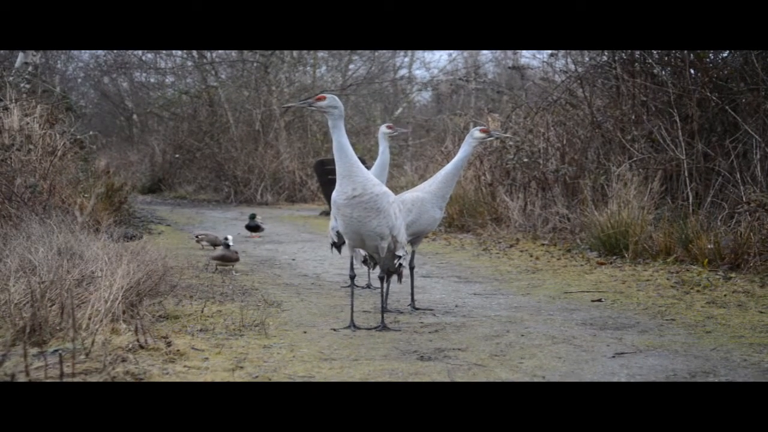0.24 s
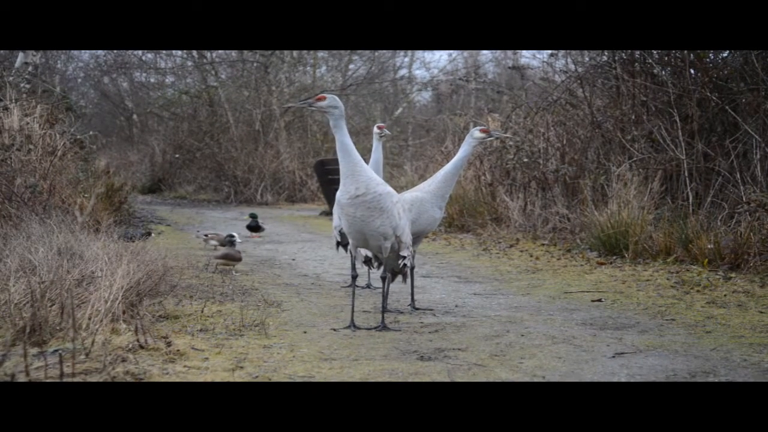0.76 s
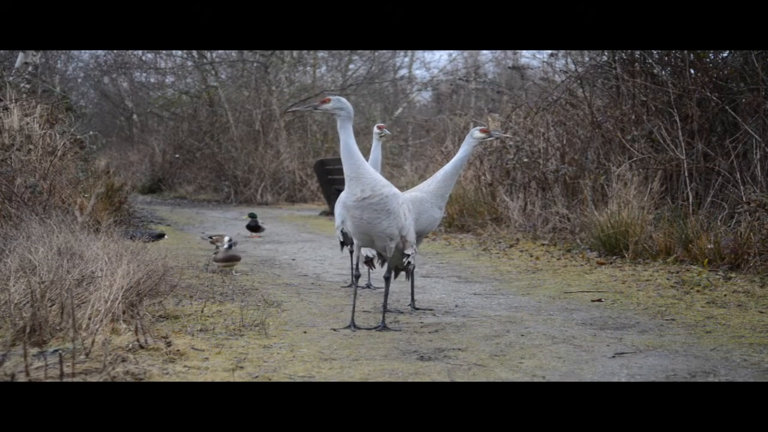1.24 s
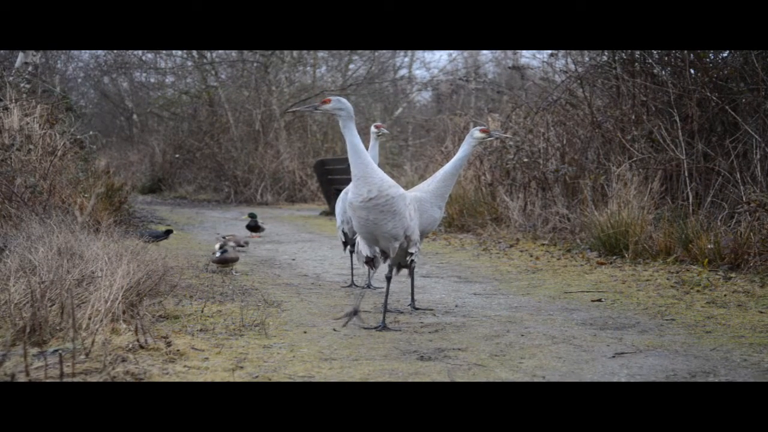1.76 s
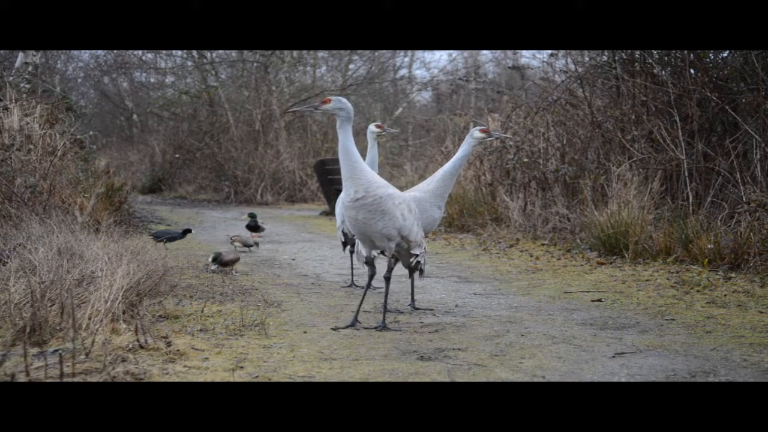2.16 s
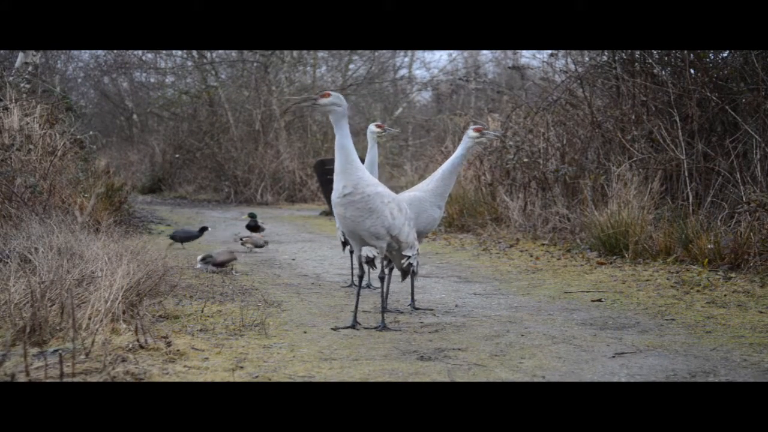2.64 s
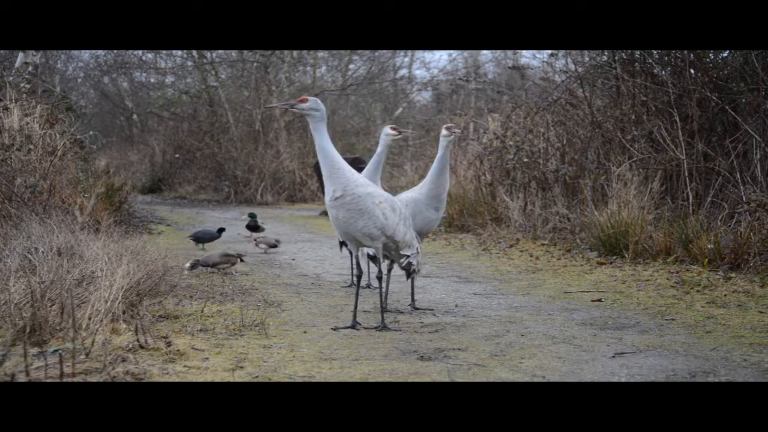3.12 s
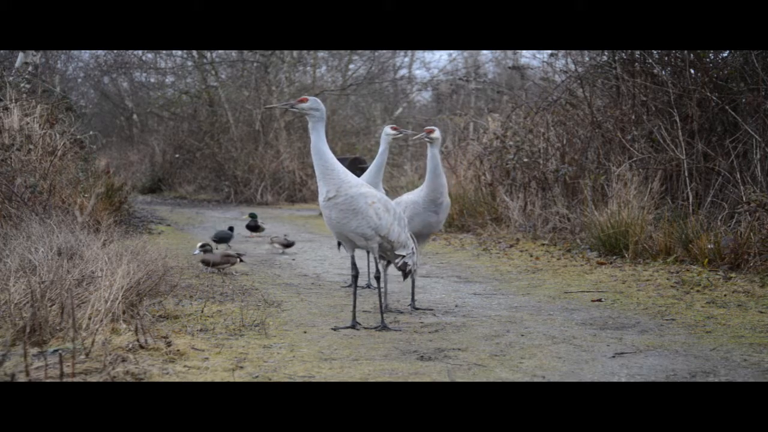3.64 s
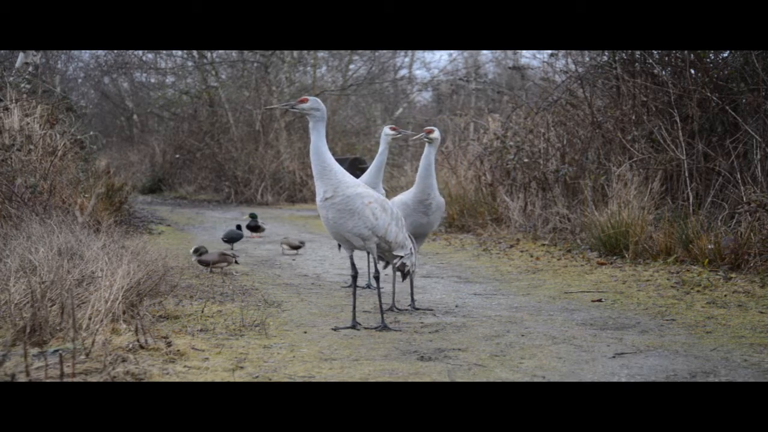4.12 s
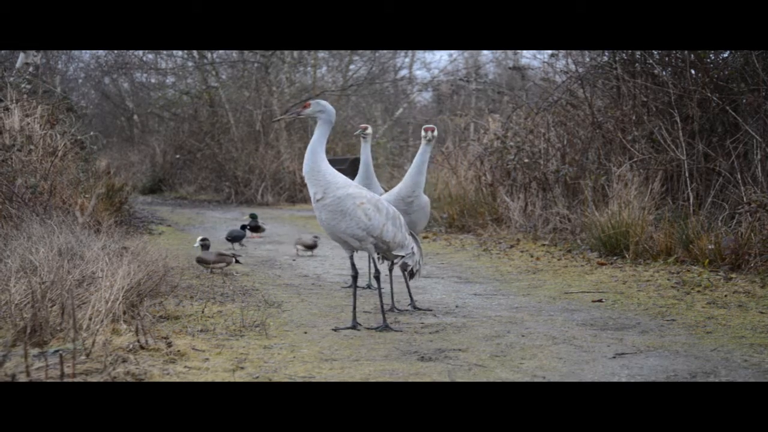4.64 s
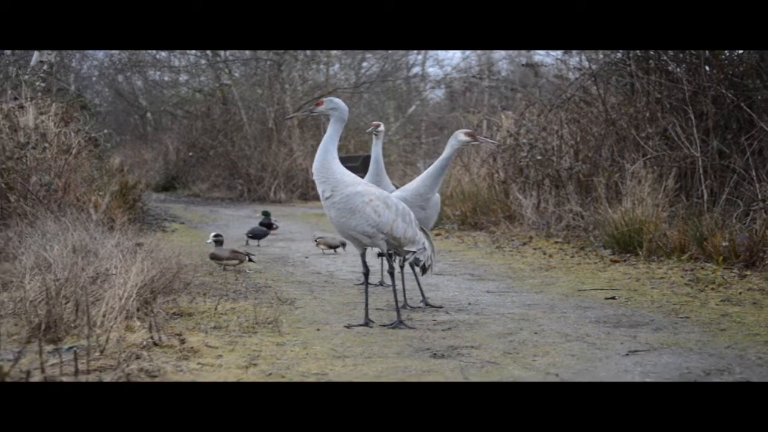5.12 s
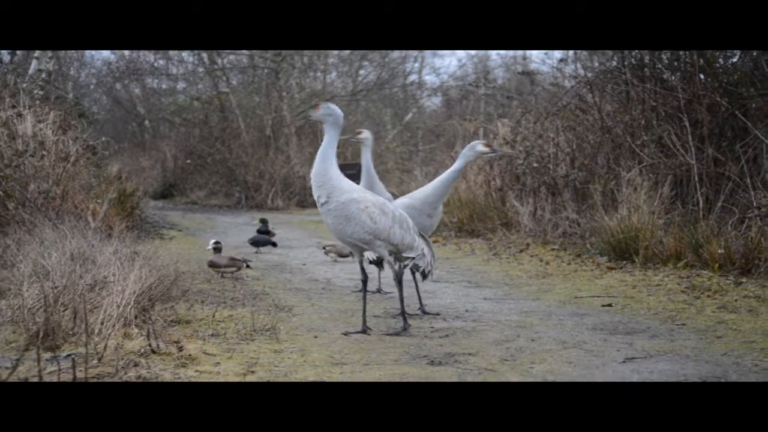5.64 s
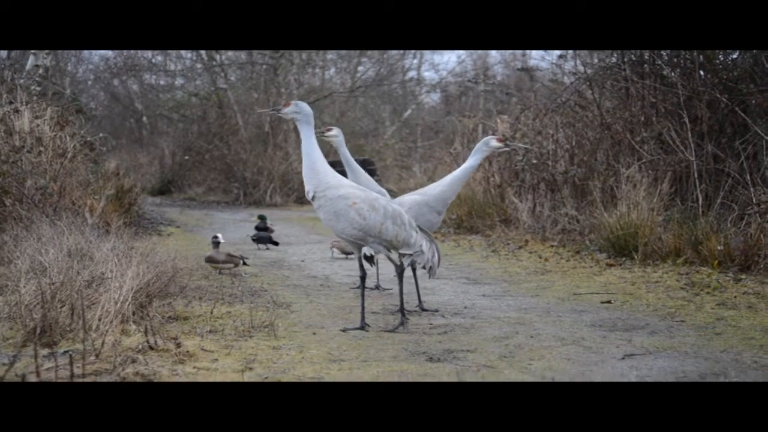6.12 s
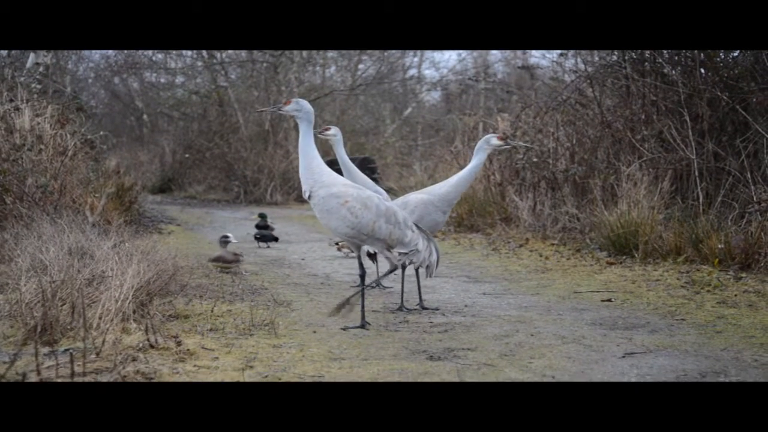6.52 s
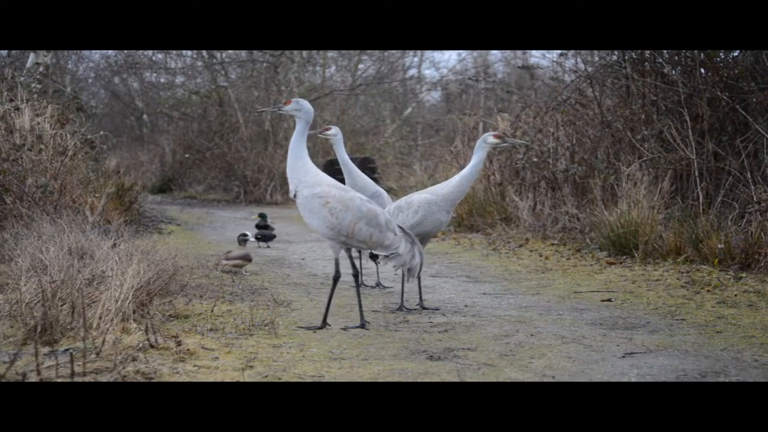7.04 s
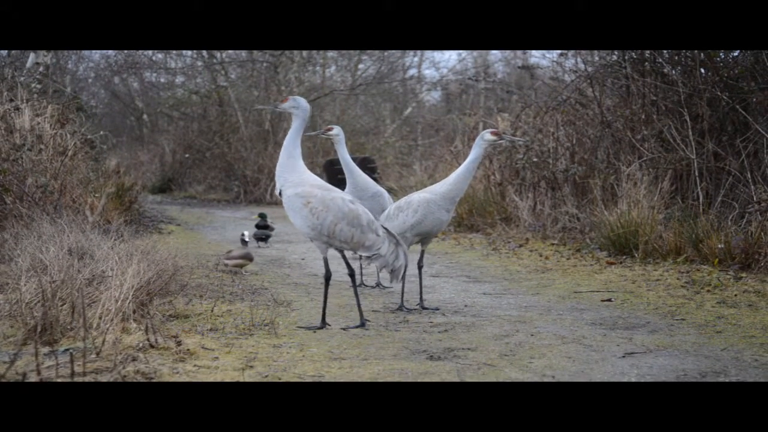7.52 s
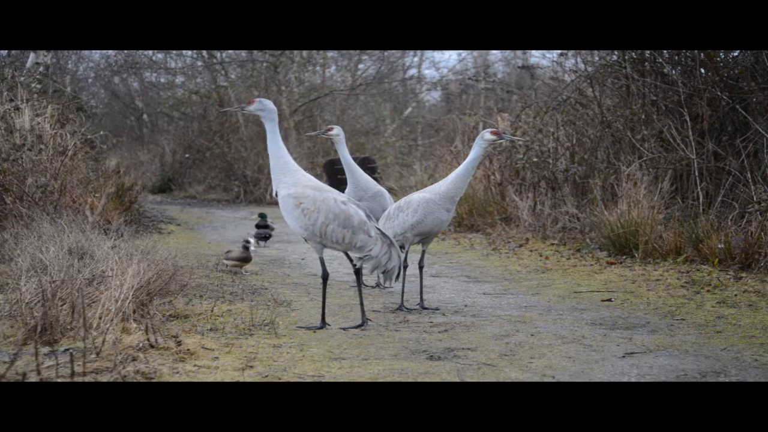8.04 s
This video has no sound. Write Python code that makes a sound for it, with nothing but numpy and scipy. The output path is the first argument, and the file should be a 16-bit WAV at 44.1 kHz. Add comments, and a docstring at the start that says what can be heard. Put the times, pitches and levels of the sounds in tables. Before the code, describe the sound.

Sandhill cranes give two loud rattling calls outdoors, with faint sharp taps and soft rustles over still air between them.

```python
"""Sharp taps, ticks and soft rustles sound close by on a wooded path, over a hum and small far birds.
Then sandhill cranes call twice, near enough to overload the microphone. Each call is a short reedy
note, then a rattle of falling honks, a low and a high voice interleaved with hoarse squawks.
The syrinx slaps once a cycle and rings the windpipe; the thicket scatters the calls and rings on."""
import sys
import numpy as np
from scipy import signal
from scipy.fft import rfft, irfft, next_fast_len
from scipy.io import wavfile
from scipy.ndimage import map_coordinates

SR = 44100
rng = np.random.default_rng(int(sys.argv[2]) if len(sys.argv) > 2 else 0)


def unload_wav(signal):
    """Save mono or channel-first audio to the path in sys.argv[1] as 16-bit WAV at rate SR, clipped to [-1, 1]."""
    wavfile.write(
        sys.argv[1],
        SR,
        np.round(np.clip(np.atleast_2d(signal).T, -1, 1) * 32767).astype(np.int16),
    )


N = 364707
TOP_HZ = 15900  # band limit


def amp(db):
    """Decibels to gain."""
    return 10 ** (np.asarray(db) / 20)


def unit(x):
    """Scale to rms 1."""
    return x / np.sqrt(np.mean(x ** 2) + 1e-20)


def along(points, hz):
    """Read a (Hz, value) curve on a log frequency axis."""
    freqs, values = np.transpose(points)
    return np.interp(np.log(hz + 1), np.log(freqs + 1), values)


def automation(points, t):
    """Read a (seconds, value) curve at the times t."""
    return np.interp(t, *np.transpose(points))


def wobble(rate, size):
    """A smooth random curve, rate knots a second."""
    return map_coordinates(rng.standard_normal(size // 8 + 8), [np.arange(size) * rate / SR + 2])


def add(track, start, x):
    """Mix x into the track at start seconds."""
    i = max(round(start * SR), 0)
    track[i:i + len(x)] += x[:len(track) - i]


def colour(x, points):
    """Minimum-phase EQ along a (Hz, dB) curve."""
    size = next_fast_len(len(x) + 2048)
    cepstrum = irfft(np.log(amp(along(points, np.fft.rfftfreq(size, 1 / SR)))), size)
    cepstrum[1:size // 2] *= 2
    cepstrum[size // 2 + 1:] = 0
    return irfft(rfft(x, size) * np.exp(rfft(cepstrum)), size)[:len(x)]


def noise(points):
    """Coloured noise of rms 1."""
    return unit(colour(rng.standard_normal(N), points))


def sine(hz):
    """A sine that follows a pitch curve."""
    return np.sin(2 * np.pi * np.cumsum(hz) / SR)


def wavering(hz, width_hz, size):
    """A narrow band of noise, heard as an unsteady tone; rms 1."""
    phase = 2 * np.pi * hz * np.arange(size) / SR
    return unit(wobble(width_hz, size) * np.cos(phase) + wobble(width_hz, size) * np.sin(phase))


def puff(points, decay_s):
    """A coloured burst of energy 1 that dies quickly, with a weak after-rattle."""
    t = np.arange(SR // 25) / SR
    envelope = np.exp(-t / decay_s) + .025 * np.exp(-t / .008)
    burst = colour(rng.standard_normal(len(t)) * envelope, points)
    return burst / np.linalg.norm(burst)


# Tone of the still air. Each row: frequency in Hz, gain in dB.
AIR_EQ = [(10, -38), (25, -16.5), (50, -2.5), (90, 0.5), (130, -6), (200, -7), (450, -14), (1250, -17.5),
          (2240, -16.5), (3300, -19.5), (4800, -15.5), (6000, -19.5), (8500, -29), (11000, -28.5),
          (15800, -26)]
# Swells of the engine hum. Each row: time in seconds, level in dB.
HUM_LEVELS = [(0, -67), (1.3, -59.5), (2.4, -65.5), (3.7, -62), (4.8, -70.5), (6.7, -55), (7.4, -53),
              (8.27, -71.5)]
def background(air_db=-52.5, whine_db=-66, hum_hz=152, whine_hz=4815):
    """The bed: still air, a distant engine hum and a thin high whine."""
    t = np.arange(N) / SR
    air = amp(air_db + .15 * wobble(8, N)) * noise(AIR_EQ)
    hum = amp(automation(HUM_LEVELS, t) + wobble(7, N)) * sine(hum_hz + 1.8 * wobble(9, N))
    whine = amp(whine_db) * sine(whine_hz + 7 * wobble(60, N))
    return air + np.sqrt(2) * (hum + whine)  # sine peak from rms


# Bird notes. Each row: start in seconds, length in seconds, pitch in Hz, level in dB.
CHIRP_CUES = [(0.384, 0.013, 1510, -45.5), (0.722, 0.027, 2250, -47.5), (1.337, 0.043, 2080, -56),
              (1.4, 0.4, 4120, -59), (7.25, 0.42, 1226, -58.5), (7.82, 0.25, 860, -64),
              (8.0, 0.16, 865, -62)]
def far_birds():
    """Faint notes from the bushes, each fading in and out."""
    out = np.zeros(N)
    for start, length, hz, db in CHIRP_CUES:
        size = int(length * SR)
        add(out, start, amp(db) * np.hanning(size) * wavering(hz, .16 * hz, size))
    return out


# Decay of the thicket's reverb. Each row: frequency in Hz, seconds to fall by 60 dB.
THICKET_DECAY = [(200, 0.27), (700, 2.2), (1050, 2.09), (1700, 1.9), (5000, 1.42), (8000, 1.7),
                 (15000, 0.17)]
# Tone of that reverb. Each row: frequency in Hz, gain in dB.
THICKET_EQ = [(200, -12), (600, -2.5), (800, -4), (1100, -5.5), (1350, -4.5), (1800, 0.5), (2400, 1.5),
              (3200, -1.5), (5500, -2.5), (9000, -9)]
def thicket(send, build_s=.012, near_db=5, near_s=.0095):
    """Twigs and trunks scatter the sound back, the near bushes first."""
    hz, t, bands = signal.stft(rng.standard_normal(2 * SR), SR, nperseg=256)
    onset = (1 - np.exp(-t / build_s)) * (1 + amp(near_db) * np.exp(-t / near_s))
    decay = amp(-60 * t / along(THICKET_DECAY, hz)[:, None])
    tail = signal.istft(bands * onset * decay, SR, nperseg=256)[1]
    return signal.fftconvolve(send, colour(tail / np.linalg.norm(tail), THICKET_EQ))[:N]


# Rustles. Each row: start, rise, hold and fade in seconds, relative level in dB.
RUSTLE_CUES = [(0.012, 0.0082, .003, .012, -24.5), (.03, .01, .01, .06, -39), (0.202, .005, .01, .25, -52),
               (4.21, .012, .03, .015, -45), (4.279, .08, 0.14, 0.053, -40), (4.67, 0.0021, .055, .01, -44),
               (4.901, 0.015, 0.017, .02, -46), (5.43, .006, .003, .008, -42),
               (5.582, 0.01, .016, .006, -39.5), (5.672, .022, .005, .008, -24)]
# Their papery tone. Each row: frequency in Hz, gain in dB.
RUSTLE_EQ = [(120, -62), (200, -28.5), (235, -18.5), (405, -25.5), (451, -12), (683, -18), (1290, -8),
             (4090, -6.5), (5170, 4), (5860, -11.5), (6420, -5.5), (8120, -27), (15000, -35.5)]
def rustles():
    """Soft grainy brushing sounds: each rises, holds and fades."""
    t = np.arange(N) / SR
    envelope = np.zeros(N)
    for start, rise, hold, fade, db in RUSTLE_CUES:
        attack = np.clip((t - start) / rise, 0, 1)
        release = np.exp(-np.maximum(t - start - rise - hold, 0) / fade)
        envelope += amp(db - .5) * attack * release
    grain = unit(noise(RUSTLE_EQ) * amp(2.5 * wobble(250, N)))
    return envelope * grain


# Bright crack and duller knock of a tick or tap. Each row: frequency in Hz, gain in dB.
CRACK_EQ = [(300, -20.5), (1500, -34), (2800, -5.5), (4500, -1.5), (5400, 5), (6700, -7), (8000, -15),
            (10000, -29), (16000, -51.5)]
KNOCK_EQ = [(200, -36.5), (700, -7.5), (1200, -1), (2000, -3), (2700, -6.5), (4000, -17), (9000, -57)]
def ticks(count=52, softest_db=-42, range_db=12):
    """Faint scattered ticks from the damp path and the bushes."""
    out = np.zeros(N)
    for when, strength, dullness in rng.random((count, 3)):
        tick = puff(CRACK_EQ, .0015) + dullness * puff(KNOCK_EQ, .0015)
        add(out, when * N / SR, amp(softest_db + range_db * strength) * tick)
    return out


# Low end of a tap. Each row: frequency in Hz, gain in dB.
THUD_EQ = [(30, -17.5), (160, 0.5), (330, 14.5), (900, -4.5), (2000, -30), (6000, -59)]
# Taps. Each row: start in seconds, then relative levels in dB of the whole tap, its knock, its thud.
TAP_CUES = [(.014, -13.5, -32, -46), (.0484, -29, -3.5, -3), (0.1474, -15.5, -20, -33),
            (0.2139, -29.5, -10, -12), (0.2565, -30.5, -21, -33), (0.7283, -28, -19, -35),
            (.989, -28, -25, -31), (1.28, -32.5, -23, -35), (1.3903, -39.5, -11, 4.5),
            (1.5224, -32.5, 6.5, 1.5), (2.0584, -29.5, -0.5, -13), (4.0462, -27, 6, -1),
            (4.334, -29, 3, -12), (4.6701, 1, -36, -50.5), (4.7783, -32.5, -8, -29),
            (5.1751, -14.5, -9.5, -50), (5.3277, -14.5, -17.5, -17.5), (5.435, -31.5, -11, -20),
            (5.5164, -20, -34, -48.5), (5.614, -36.5, -10, 9), (5.9475, 15, -23.5, -21),
            (6.9314, -20.5, -24, -28), (7.0424, -22.5, -16, -30), (8.023, -28.5, -20, -27),
            (8.2257, -41, 1, -3)]
def taps(ring_hz=4465, ring_spread=.063):
    """Tiny hard impacts close by: a crack with a short ring, a knock and a thud."""
    out = np.zeros(N)
    t = np.arange(SR // 25) / SR
    for start, db, knock_db, thud_db in TAP_CUES:
        hz = ring_hz * (1 + ring_spread * rng.standard_normal())
        ring = .22 * np.sin(2 * np.pi * hz * t) * np.exp(-t / .0012)
        crack = puff(CRACK_EQ, .0009)
        knock = amp(knock_db + 4) * puff(KNOCK_EQ, .001)
        thud = amp(thud_db + 2) * puff(THUD_EQ, .0025)
        add(out, start, amp(db + 9) * (crack + ring + knock + thud))
    return out


# Resonances of a crane's windpipe. Each row: frequency in Hz, gain in dB.
WINDPIPE_EQ = [(1000, -7), (1350, 9.5), (1650, 7), (1930, -4.5), (2300, 1.5), (2750, -1.5), (3350, 1),
               (3900, 1.5), (4550, 3), (5000, 4.5), (5450, 7), (6400, 0), (8200, -13.5), (10000, -26.5),
               (16000, -29.5)]
def syrinx(pitch, overtone_db, rasp):
    """A fundamental, and a slap each cycle that rings the windpipe; rasp makes it uneven and noisy."""
    phase = 2 * np.pi * np.cumsum(pitch) / SR
    uneven = wobble(800, len(pitch))
    slaps = sum(np.cos(k * phase) * (k * pitch < TOP_HZ) for k in range(2, 16))
    hiss = rng.standard_normal(len(pitch)) * (1 + np.cos(phase)) ** 2  # pulses with the slaps
    hiss = signal.sosfilt(signal.butter(2, 800, "high", fs=SR, output="sos"), hiss)
    buzz = unit(slaps) * (1 + .5 * rasp * uneven) + rasp * unit(hiss)
    fundamental = -np.cos(phase + .6) * (1 + .35 * rasp * uneven)
    return fundamental - amp(overtone_db - 1) * unit(colour(buzz, WINDPIPE_EQ))


# The note that opens each call. Each row: start and length in seconds, relative level in dB,
# flutter rate in Hz, pitch swing as a share of the pitch, rasp from 0 to 1.
OPENING_CUES = [(2.576, .059, -10.5, 530.4, 0.089, 0.3), (5.702, 0.062, -9.5, 178.7, .1, 0.6)]
def opening_notes(from_hz=944, to_hz=1108, rise_s=.024, attack_s=.0011, release_s=.0035):
    """Held notes that slide up as pressure builds; a second vibration of the syrinx adds sidebands."""
    out = np.zeros(N)
    t = np.arange(SR // 8) / SR
    slide = to_hz + (from_hz - to_hz) * np.exp(-t / rise_s)
    for start, length, db, flutter_hz, swing, rasp in OPENING_CUES:
        release = np.exp(-np.maximum(t - length, 0) / release_s)
        envelope = amp(db) * (1 - np.exp(-t / attack_s)) * release
        progress = np.minimum(t / length, 1)
        overtone_db = -12.5 + 12 * np.sin(np.pi * progress ** 1.3)  # brightest past the middle
        flutter = sine(flutter_hz * slide / np.mean(slide[t < length]))
        pitch = slide * (1 + swing * flutter + .022 * wobble(500, len(t)))
        shimmer = amp(.8 * wobble(300, len(t)))
        voice = envelope * shimmer * (1 + .27 * flutter) * syrinx(pitch, overtone_db, rasp)
        # the hoarse undertone swells less than the note, so it shows most at the two ends
        undertone = amp(-22) * np.sqrt(envelope) * wavering(520, 280, len(t))
        add(out, start, voice + undertone)
    return out


def honk(length, burst_hz, end_hz, db, tail_db, overtone_db,
         burst_s=.00552, release_s=.0071, glide_s=.014, dulling_db=7):
    """A hard burst of a few cycles, then a rough weaker tail as pressure sags and the pitch glides."""
    t = np.arange(SR // 12) / SR
    settled = 1 - np.exp(-(t / burst_s) ** 4)  # crossfade from burst to tail
    shimmer_db = 1.5 * wobble(260, len(t))
    jitter = (.02 + .04 * settled) * wobble(600, len(t))
    burst = amp(db + 1) * (1 - settled)
    tail = amp(db + tail_db + shimmer_db - 4.5 * np.minimum(t / length, 1)) * settled
    attack = 1 - np.exp(-(t / .0013) ** 2)
    release = np.exp(-np.maximum(t - length, 0) / release_s)
    glide = end_hz + (burst_hz - end_hz) * np.exp(-(t - burst_s / 2) / glide_s)
    # the slaps are hardest at the start and soften first as the note dies
    bite_db = 3 * np.exp(-t / .0039) - dulling_db * (1 - release)
    flicker_db = 1.5 * settled * wobble(340, len(t))
    bright_db = overtone_db - .7 + bite_db + flicker_db
    voice = syrinx(glide * (1 + jitter), bright_db, rasp=.28 + .5 * settled)
    return attack * (burst + tail) * release * voice


# Squawks between the honks. Each row: start in seconds, relative level in dB.
SQUAWK_CUES = [(2.819, -11.5), (5.805, -9.5), (5.88, -12.5), (5.947, -17), (6.005, -14), (6.06, -15)]
def squawks(length_s=.027, hz=999, squeal_from_hz=1896, squeal_to_hz=1136):
    """Weak hoarse honks on a level pitch, with a squeal falling through each."""
    out = np.zeros(N)
    size = int(length_s * SR)
    for start, db in SQUAWK_CUES:
        squawk = honk(length_s, hz, hz, db, tail_db=-9.5, overtone_db=-1.5)
        pitch = np.linspace(squeal_from_hz, squeal_to_hz, size) * (1 + .1 * wobble(600, size))
        squeal = amp(db - 7) * signal.windows.tukey(size) * sine(pitch)
        add(squawk, 0, squeal)
        add(out, start - .0008, squawk)
    return out


# Honks, the low voice near 950 Hz and the high one near 1120 Hz.
# Each row: start in seconds, length in seconds, burst pitch in Hz, relative level in dB.
HONK_CUES = [(2.566, .004, 943, -25.5), (2.704, .004, 946, -18.5), (2.7092, 0.025, 954, -2.5),
             (2.776, .014, 1081, -22.5), (2.7899, 0.017, 957.5, -3.5), (2.8515, .018, 955, -5),
             (2.8796, .016, 1115, -9.5), (2.891, .011, 1010, -5.5), (2.9064, 0.018, 925, -6),
             (2.9427, .023, 1117, -5.5), (2.956, 0.015, 951, -6.5), (2.9975, .026, 1055, -5.5),
             (3.0529, 0.022, 1149, -6.5), (3.1045, 0.019, 1111, -7), (3.152, .016, 1101, -7.5),
             (3.196, .012, 1068, -8.5), (3.242, 0.0095, 1088, -18), (5.694, .008, 1042, -18),
             (5.8337, 0.025, 947.5, -2), (5.915, 0.016, 966, -4), (5.975, .018, 968, -5),
             (6.03, .018, 928, -5), (6.0837, .016, 895, -6.5), (6.095, 0.025, 1107, -7.5),
             (6.129, 0.019, 896, -8), (6.156, 0.012, 1161, -5), (6.174, .007, 833, -15.5),
             (6.2135, .015, 1146, -6), (6.2662, 0.015, 1167, -5.5), (6.3168, .013, 1135, -5.5),
             (6.364, 0.018, 1084, -7), (6.4108, 0.014, 1019, -8), (6.457, .01, 962, -20.5)]
# Their brightness, duller as the calling goes on. Each row: time in seconds, overtone trim in dB.
HONK_BRIGHTNESS = [(2.8, 2), (3.2, -2), (5.8, -2.6), (6.3, -1.5)]
def rattle(end_ratio=.82, tail_db=-8.5):
    """Quick runs of honks from two voices, each honk falling in pitch."""
    out = np.zeros(N)
    for start, length, hz, db in HONK_CUES:
        overtone_db = automation(HONK_BRIGHTNESS, start)
        add(out, start - .0008, honk(length, hz, end_ratio * hz, db, tail_db, overtone_db))
    return out


# The windpipe radiates little below its first resonance. Each row: frequency in Hz, gain in dB.
VOICE_LOW_CUT = [(200, -31), (450, -11), (600, -11.5), (740, 3.5), (1000, -1)]
def cranes(echo_s=.0075, echo_db=-16):
    """Both calls, with one early reflection from the side of the path."""
    direct = opening_notes() + rattle() + squawks()
    out = direct.copy()
    add(out, echo_s, amp(echo_db) * direct)
    return colour(out, VOICE_LOW_CUT)


def scene():
    """The mono mix: calls ring in the thicket, while the small close sounds stay nearly dry."""
    calls = cranes()
    close = taps() + ticks() + rustles()
    reverb = thicket(amp(-19.5) * calls + amp(-35.5) * close)
    return (calls + close + reverb + far_birds() + background())[None]


# Tone after the overloaded input. Each row: frequency in Hz, gain in dB.
OUTPUT_EQ = [(30, -5.5), (250, -0.5), (600, 3), (5000, 1), (8000, 3.5), (12000, -0.5), (16000, -1.5)]
def record(dry):
    """The input overloads near full scale; the bass is thinned and the top cut at the band limit."""
    clipped = dry[0] / (1 + np.abs(dry[0] / 1.03) ** 8) ** (1 / 8)
    size = next_fast_len(N + 4096)
    spectrum = rfft(colour(clipped, OUTPUT_EQ), size)
    passband = np.fft.rfftfreq(size, 1 / SR) < TOP_HZ
    return irfft(spectrum * passband, size)[None, :N]


dry = scene()
out = record(dry)
unload_wav(out)
```